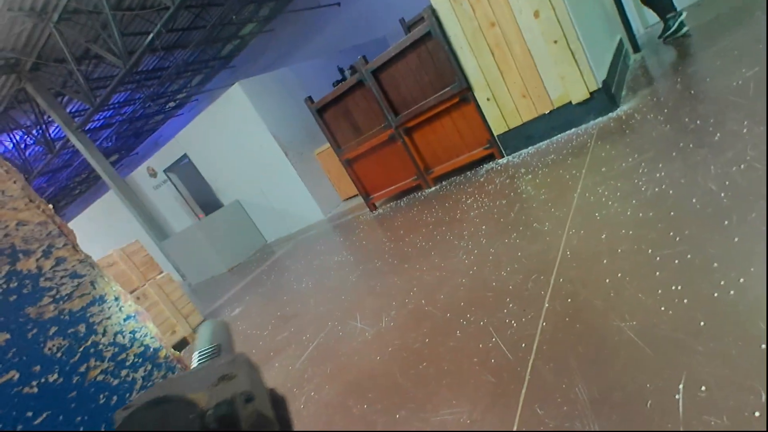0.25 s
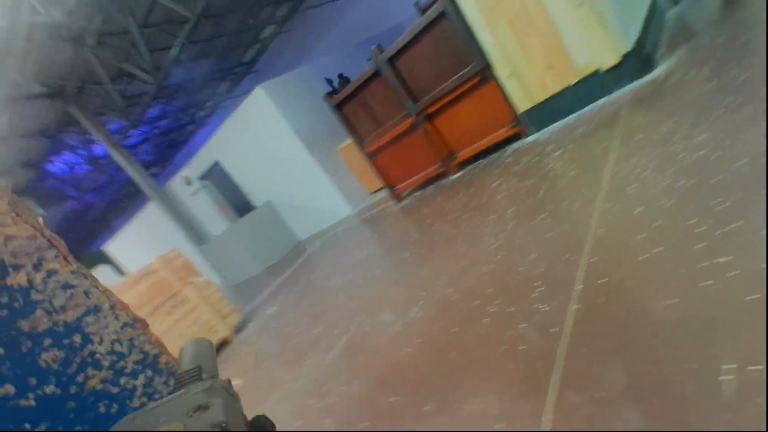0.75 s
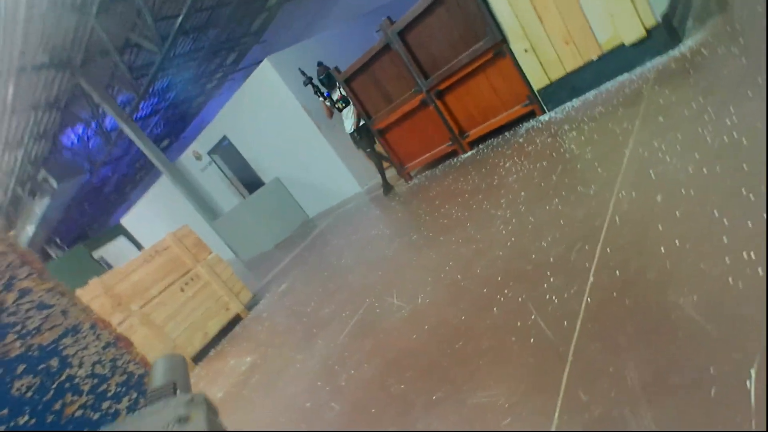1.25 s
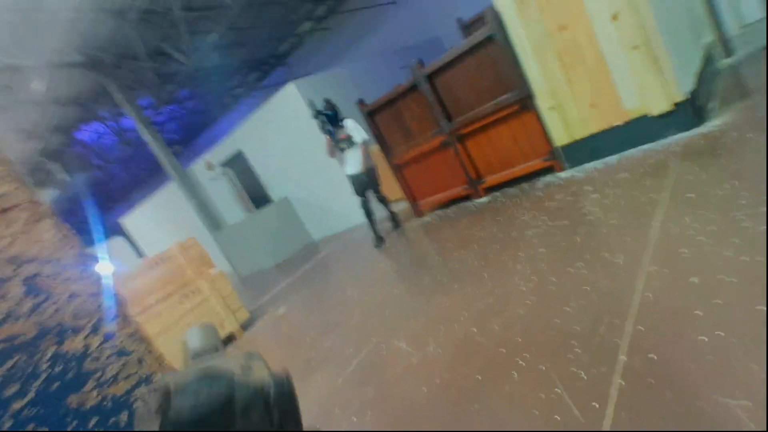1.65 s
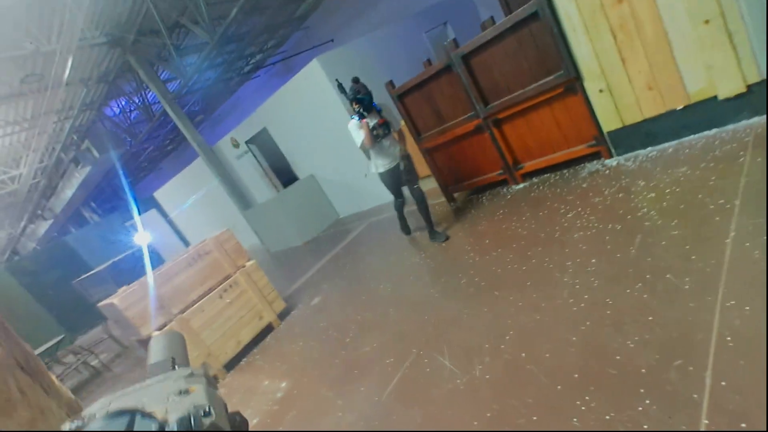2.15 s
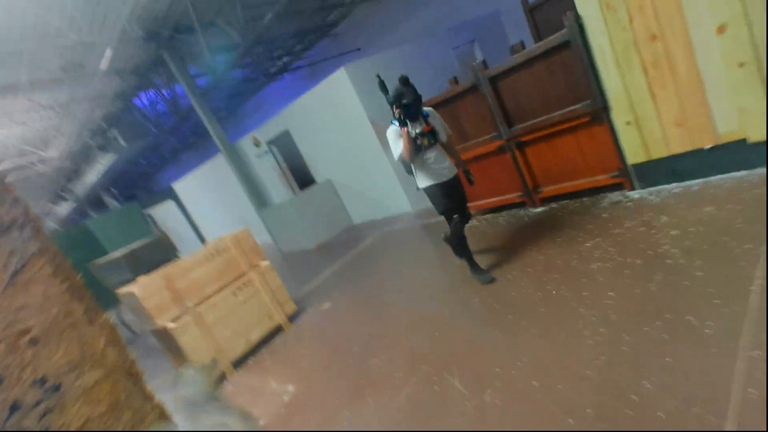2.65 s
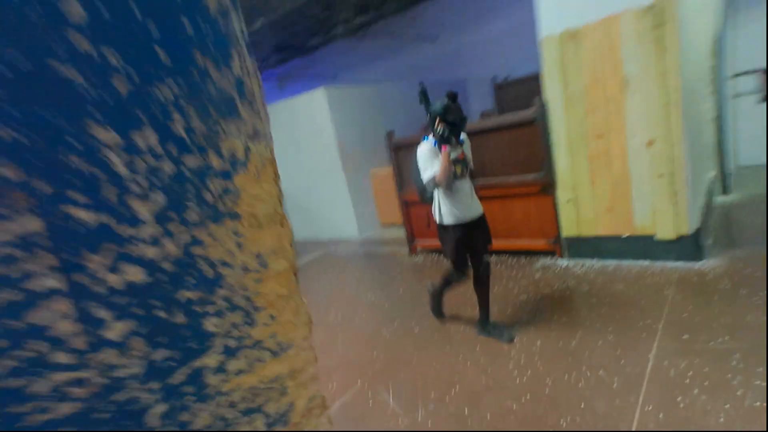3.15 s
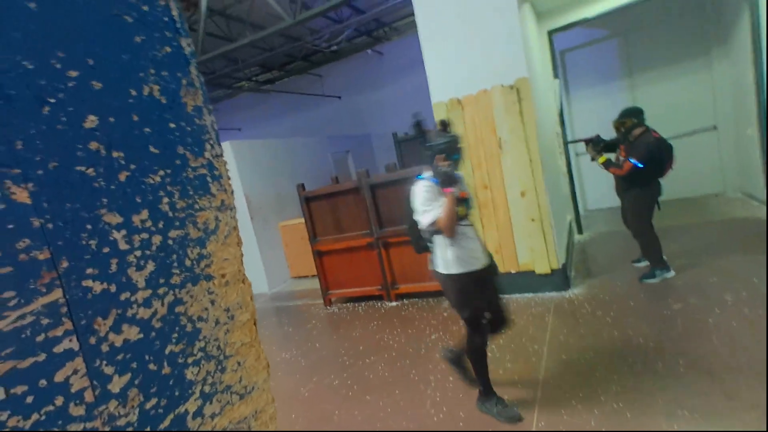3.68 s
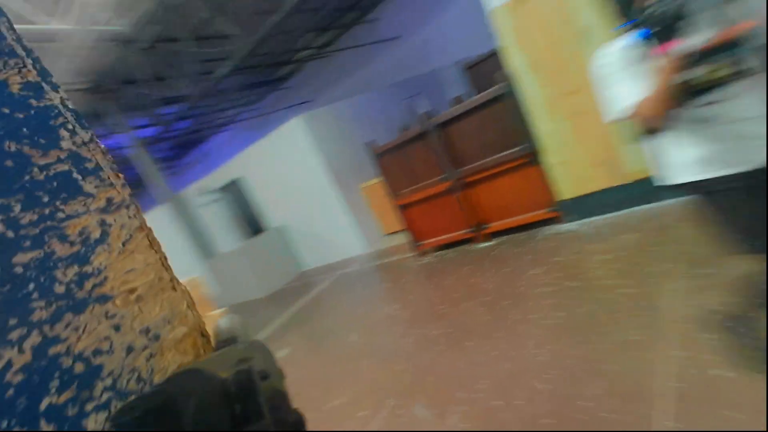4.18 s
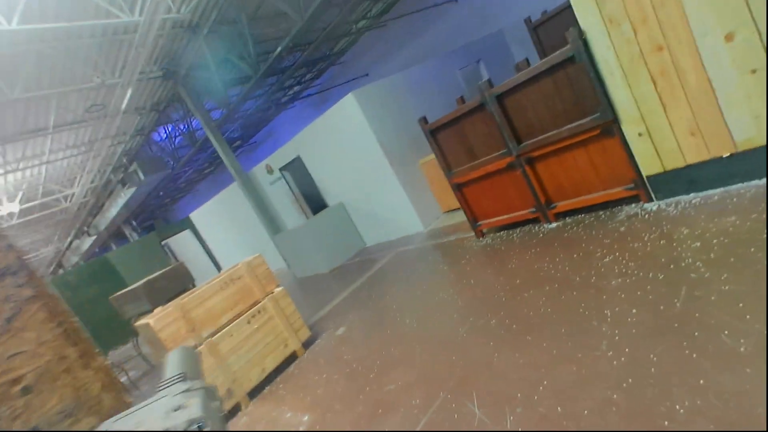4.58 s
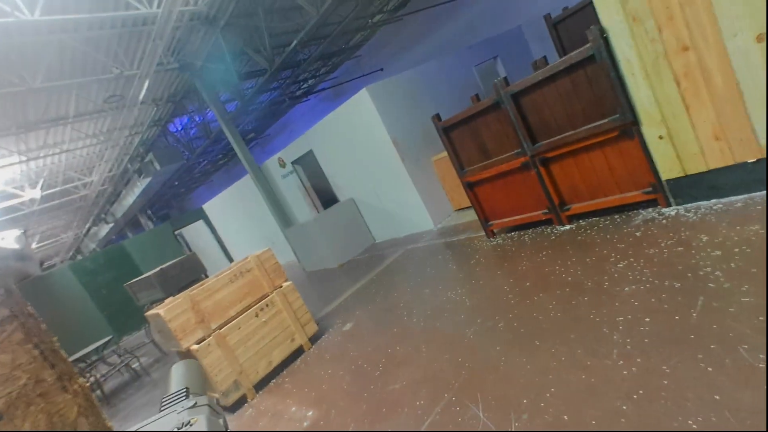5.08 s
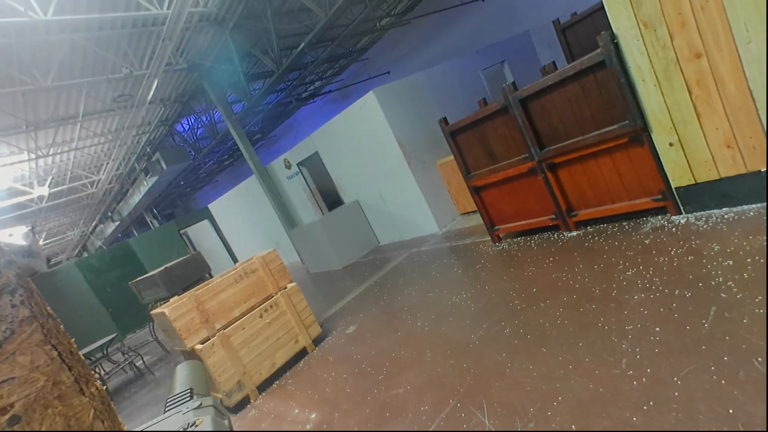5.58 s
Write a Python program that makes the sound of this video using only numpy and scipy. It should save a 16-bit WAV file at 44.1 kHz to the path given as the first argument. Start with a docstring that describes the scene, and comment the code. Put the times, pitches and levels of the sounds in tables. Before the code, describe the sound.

Close, muffled camera-housing sound in a big hall: soft booms, plastic taps and small ticks, with blurred far gunfire swelling behind. Two close airsoft shots clatter in the middle, each a rapid cluster of piston and bolt clacks jolting the mount. Later, bumps thicken, other players' shots crack and echo, a single close shot hits hard, then lighter cracks fade into airy din.

```python
"""Airsoft rifle in an echoing hall

Three shots, two close together and one later, are clusters of short noise clacks with damped metal modes.
Jolts and handling drive damped modes of the camera mount, which booms and knocks; its housing taps and ticks.
Distant shots are noise cracks and frequency-dependent hall tails, over a swelling and ebbing din and hiss.
Airborne noise takes the colour of housing and microphone port; the loudest peaks saturate."""
import sys
import numpy as np
from scipy import signal
from scipy.fft import rfft, irfft, next_fast_len
from scipy.io import wavfile
from scipy.ndimage import map_coordinates

SR = 44100
rng = np.random.default_rng(int(sys.argv[2]) if len(sys.argv) > 2 else 0)


def pcm_store(signal):
    """Save signal as 16-bit PCM."""
    levels = np.round(np.clip(np.atleast_2d(signal), -1, 1) * 32767)
    wavfile.write(sys.argv[1], SR, levels.astype(np.int16).T)


N = 257103  # samples

# Shots of the near rifle. Each row: start in seconds, first clack to piston slam in seconds,
# clack gain in dB, gain of the kick into the mount in dB.
SHOTS = [(2.3918, .0685, -1.5, 0), (2.5505, .081, -2, -4), (4.5488, .0853, -1.5, 4)]
# Clacks of one firing cycle. Each row: place (0 start, 1 slam), level in dB, dull body in dB relative,
# treble in dB relative, nominal t60 in seconds, nominal rise in seconds.
CYCLE_CLACKS = [(0, -22.5, -19, -18, 0.018, 0.0032), (.1, -12.5, -27, -16, 0.027, 0.0017),
                (.25, -12, 1.5, -19, 0.014, 0.00097), (0.446, -15, 5, -15, 0.043, 0.00085),
                (.845, -24.5, 4.5, -16.5, .033, .002), (0.996, -6.5, -24, -15, 0.032, 0.0029)]
# Loose parts rattling around the slam. Each row: start in seconds, level in dB, dull body in dB relative.
RATTLES = [(2.4563, -23, 5.5), (2.4947, -24, 8.5), (2.5004, -18, 1), (2.674, -31, 2), (4.6466, -20, 20),
           (4.657, -32, 15), (4.6677, -24, 12.5), (4.676, -23, 3.5), (4.7068, -39, 23)]
RATTLE_TREBLE_DB, RATTLE_T60_S, RATTLE_RISE_S = -21, 0.016, 0.00102
# The rifle's parts ringing. Each row: frequency in Hz, level in dB, t60 in seconds.
METAL_MODES = [(1280, 0, .025), (3000, -6, .014), (3500, -7, .012), (4420, -1, .024), (5400, -9, .013),
               (7250, -13, .015)]
# Clack spectrum. Each row: frequency in Hz, relative density in dB per Hz.
CLACK_COLOUR = [(1200, -33), (2000, -2), (3100, -5), (4500, -0.5), (6000, 1.5), (7500, -93)]
# Clack treble spectrum. Each row: frequency in Hz, relative density in dB per Hz.
TREBLE_COLOUR = [(5000, -43.5), (6000, 0), (10000, 8), (16500, 2)]
# Dull receiver rattle spectrum. Each row: frequency in Hz, relative density in dB per Hz.
BODY_COLOUR = [(290, -89.5), (500, -26.5), (625, -1), (945, -2.5), (1290, 7.5), (1630, 1.5), (1810, -7),
               (2040, -53), (2400, -10.5), (3120, -41), (5280, -120)]

# Jolts of the mount. Each row: start in seconds, tap level in dB, knock level in dB, knock pitch in Hz,
# boom level in dB.
JOLTS = [(0.259, -60, -45, 171, -29.5), (0.503, -40.5, -33.5, 114, -38), (0.662, -41, -30, 193, -27),
         (0.702, -44, -41, 120, -59), (0.774, -20, -25, 190, -26.5), (0.973, -45, -45, 133, -43),
         (1.135, -45, -37.5, 150, -30.5), (1.299, -48, -45, 145, -28), (1.334, -36, -35, 170, -28.5),
         (1.362, -26, -22, 184, -50), (1.394, -32, -34, 197, -34), (1.641, -23.5, -6.5, 114, -5),
         (1.653, -11, -20.5, 174, -14), (2.05, -30, -31.5, 117, -30.5), (2.252, -22, -23.5, 178.5, -38),
         (2.304, -25, -29.5, 173, -23), (2.369, -24.5, -35, 186, -49), (2.451, -20, -8, 107, -18),
         (2.487, -5.5, -25, 110, -2), (2.511, -16, -15, 161, -5), (2.671, -31, -33, 128, -48),
         (2.791, -27, -28.5, 178, -31), (2.839, -56, -33.5, 165, -30.5), (2.893, -29, -27.5, 184, -34.5),
         (3.056, -33, -27, 183, -34), (3.091, -53, -49, 133, -23.5), (3.327, -45, -72, 113, -30.5),
         (3.45, -50, -49, 113, -38), (3.84, -35.5, -27, 114, -12.5), (3.862, -15, -15.5, 150, -18.5),
         (3.889, -40, -25, 119, -15), (3.924, -30, -36.5, 191, -48), (4.077, -26, -14.5, 108, -10),
         (4.143, -19, -23.5, 124, -22), (4.245, -36, -17, 118, -41), (4.261, -19, -20.5, 162, -10),
         (4.282, -24, -17, 111.5, -27), (4.307, -20, -16.5, 123, -6.5), (4.474, -23, -28, 183, -37),
         (4.496, -29, -33, 141, -45), (4.66, -3.5, -20.5, 131, -6), (4.688, -14.5, -10.5, 166, -5.5),
         (4.714, -19, -14.5, 160, -8), (4.945, -34, -56, 186, -26.5), (5.096, -35, -38, 114, -30.5)]
# Jolts from one firing cycle. Each row: place (0 start, 1 slam), tap level in dB, knock level in dB,
# knock pitch in Hz, boom level in dB, direction (1 forward, -1 back).
CYCLE_KICKS = [(0, -23, -17.5, 130, -12, 1), (0.231, -8.5, -11.5, 119.4, -10, -1),
               (0.442, -16, -11.5, 154, -15, -1), (1.035, -26, -8.5, 105, -3, 1)]
# Modes of a knock. Each row: multiple of its pitch, level in dB, t60 in seconds.
FLEX_MODES = [(1, 8.5, 0.071), (1.45, -8, 0.037), (2.1, -21, 0.027)]
# A part that rings on after knocks. Each row: frequency in Hz, level in dB, t60 in seconds.
STRAP_MODES = [(322, -28, .35)]
# Housing modes. Each row: frequency in Hz, level in dB, t60 in seconds.
TAP_MODES = [(637, -8, 0.1), (776, -8, 0.037), (1157, -2.5, 0.024), (1533, -2, 0.021)]
# The mount swinging. Each row: frequency in Hz, level in dB, t60 in seconds.
BOOM_MODES = [(52.52, 3, 0.23), (43, -12, 0.11), (76.6, -5, 0.14)]
BOOM_LAG_S = 0.0033  # swing-back after the knock
SNAP_DB = -22.5  # bright edge, on top of the tap level
# Contact noise spectrum of a tap. Each row: frequency in Hz, relative density in dB per Hz.
TAP_COLOUR = [(150, -21), (300, 3.5), (520, -10.5), (750, -2), (1000, -21), (1400, -3), (2000, -22.5),
              (3000, -100)]
# Spectrum of a tap's bright edge. Each row: frequency in Hz, relative density in dB per Hz.
SNAP_COLOUR = [(1200, -25), (1700, -1.5), (2400, -7), (3200, 1.5), (4300, -19.5), (6500, -37)]
# Spectrum of a knock's rough body. Each row: frequency in Hz, relative density in dB per Hz.
THUD_COLOUR = [(60, -31), (110, 10.5), (200, -3), (330, -16), (520, -40.5), (900, -110)]

# Hard gear ticking on the housing. Each row: start in seconds, level in dB.
TICKS = [(0.704, -41), (.776, -34), (.972, -47), (1.3335, -31.5), (1.362, -39), (1.654, -21.5),
         (3.862, -28.5), (4.142, -32)]
# Modes of a tick. Each row: frequency in Hz, level in dB, t60 in seconds.
TICK_MODES = [(1475, -2, 0.023), (1690, 0.5, 0.028), (3090, -14.5, 0.019)]

# Hands shaking the mount. Each row: time in seconds, boom level in dB.
SHAKE = [(0.0, -53), (0.7, -42.5), (1.09, -50.5), (1.57, -39), (1.8, -47), (2.03, -48), (2.34, -45),
         (2.52, -19), (2.57, -28), (2.69, -52), (2.79, -39), (3.41, -57), (3.64, -48.5), (4.22, -40.5),
         (4.56, -28), (5.03, -38.5), (5.2, -45.5), (5.83, -56.5)]
# Hands rubbing the mount. Each row: time in seconds, knock level in dB.
RUB = [(0, -55), (.08, -56.5), (.2, -69.5), (.32, -45), (.45, -68.5), (.57, -50), (1.05, -71), (1.22, -45),
       (1.33, -43.5), (1.5, -62), (2.03, -65), (2.18, -51.5), (2.52, -35), (2.89, -64), (3.36, -61),
       (3.77, -64.5), (4.05, -60), (4.2, -37.5), (4.55, -41.5), (4.68, -28), (4.98, -45), (5.13, -55),
       (5.83, -70)]
# The mount flexing under the hands. Each row: frequency in Hz, level in dB, t60 in seconds.
KNOCK_MODES = [(108, -14, 0.03), (147, -2, 0.067), (182, 2, 0.11), (270, -20, 0.019)]
# The whole camera swaying. Each row: frequency in Hz, level in dB, t60 in seconds.
SWAY_MODES = [(29, 0, 0.072)]
SWAY_DB = 1.5  # relative to the boom

# Distant shots in view. Each row: start in seconds, crack level in dB.
OPEN_SHOTS = [(3.8899, -29), (4.104, -27.5), (4.3416, -28.5), (5.0407, -27), (5.318, -26.5), (5.5953, -27)]
# Early echoes of a shot in view. Each row: lag in seconds, level in dB relative,
# treble tilt in dB per octave, t60 in seconds.
WALLS = [(.017, -10.5, -6, 0.071), (.052, -8, 3, 0.014), (.068, -18, 7, .05)]
# Distant shots behind walls. Each row: start in seconds, level in dB, rise in seconds,
# treble tilt in dB per octave.
HIDDEN_SHOTS = [(0.0695, -40, 0.073, 4), (0.8194, -54.5, 0.012, 5.5), (1.106, -30, 0.12, -8),
                (1.3014, -32.5, 0.033, 1), (1.4894, -40.5, 0.024, -4.5), (1.7304, -31, 0.0065, -1.5),
                (1.8817, -31, 0.0076, -1.5), (2.0386, -30, 0.0059, -2.5), (2.1037, -33.5, 0.0073, 2),
                (2.203, -31.5, 0.0063, -0.5), (2.2542, -36, 0.0089, 3), (2.3392, -17.5, 0.11, -4),
                (2.719, -27.5, 0.038, 2.5), (2.8768, -31, 0.011, 2.5), (2.9974, -26.5, 0.14, -2.5),
                (3.3238, -42, 0.017, 2), (3.5173, -59, 0.028, 27), (4.788, -27, 0.017, 0.5),
                (4.8286, -35.5, 0.0021, 4.5)]
HALL_ANSWER_DB = -13  # on top of the crack level
# Spectrum of far shots and hall tails. Each row: frequency in Hz, relative density in dB per Hz.
FAR_COLOUR = [(200, -7), (350, 1), (1500, 0.5), (5000, 1), (16500, -1)]
# Hall decay. Each row: frequency in Hz, t60 in seconds.
HALL_T60 = [(300, 0.93), (1500, 0.77), (5000, 0.77), (8000, 0.68), (14000, 0.75)]

# Din of the hall, swelling and ebbing. Each row: time in seconds, level in dB.
WASH = [(0.0, -58.5), (1.17, -61.5), (1.3, -51), (2.55, -39.5), (3.02, -51.5), (3.54, -50), (4.53, -43),
        (5.36, -53.5), (5.83, -53.5)]
# Din spectrum. Each row: frequency in Hz, relative density in dB per Hz.
WASH_COLOUR = [(200, -54), (400, -3), (1300, 1), (3100, -1), (4500, -2.5), (7000, -6.5), (12000, -14.5)]
# Microphone noise spectrum. Each row: frequency in Hz, relative density in dB per Hz.
HISS_COLOUR = [(180, -34), (300, 4.5), (894, -1.5), (1690, -1.5), (2410, -14), (4630, -12), (15000, -17.5),
               (16600, -30)]
# Housing response to airborne noise. Each row: frequency in Hz, gain in dB.
HOUSING = [(350, -9.5), (540, -12.5), (900, -10.5), (1300, -1), (1720, -0.5), (2400, -11), (3080, -4.5),
           (3800, -10.5), (4500, -5.5), (5900, -16.5), (7000, -18.5), (8400, -28.5), (10000, -26.5),
           (13000, -34), (16500, -51)]
# Narrow microphone port resonances. Each row: frequency in Hz, width in Hz, gain in dB.
PORT = [(1745, 45, 6.5), (4480, 310, 3), (7220, 500, 3), (10450, 900, 0.5)]
TOP_HZ = 16480  # band limit


def amp(db):
    """dB to gain."""
    return 10 ** (np.asarray(db) / 20)


def unit(x):
    """x at rms 1."""
    return x / np.sqrt(np.mean(x ** 2) + 1e-20)


def along(points, hz):
    """Interpolates (Hz, value) points on a log frequency axis."""
    f, v = np.transpose(points)
    return np.interp(np.log(hz + 1), np.log(f + 1), v)


def curve(rows):
    """Interpolates (s, value) rows to one value per sample."""
    s, values = np.transpose(rows)
    return np.interp(np.arange(N) / SR, s, values)


def wobble(rate_hz):
    """Smooth random curve with rate_hz knots a second."""
    knots = rng.standard_normal(int(N * rate_hz / SR) + 4)
    return map_coordinates(knots, [np.arange(N) * rate_hz / SR])


def filtered(x, response):
    """x through a response given as a function of Hz."""
    m = next_fast_len(len(x) + 8192)
    return irfft(rfft(x, m) * response(np.fft.rfftfreq(m, 1 / SR)), m)[:len(x)]


def noise(colour, size=N, air=True, tilt_db=0):
    """Coloured noise of rms 1; airborne noise also takes the colour of housing and port."""
    def response(hz):
        gain_db = along(colour, hz) + tilt_db * np.log2(np.maximum(hz, 1700) / 1700)
        if air:
            port_db = sum(db / (1 + (2 * (hz - c) / w) ** 2) for c, w, db in PORT)
            gain_db = gain_db + along(HOUSING, hz) + port_db
        return amp(gain_db)
    return unit(filtered(rng.standard_normal(size), response))


def ring(modes, attack_s, scatter_db=0, detune=0):
    """Damped modes after one blow, each with random strength and pitch offsets."""
    t = np.arange(SR // 2) / SR
    tone = np.zeros(len(t))
    for hz, db, t60 in modes:
        a, b = rng.standard_normal(2)
        decay = amp(db + scatter_db * a - 60 * t / t60)
        tone += decay * np.sin(2 * np.pi * hz * (1 + detune * b) * t)
    return tone * (1 - np.exp(-t / attack_s)) ** 2


def puff(rise_s, t60_s, size):
    """Envelope with a rounded rise and exponential decay, peak 1."""
    t = np.arange(size) / SR
    rise = (1 - np.exp(-t / max(rise_s, 0.0002))) ** 2
    shape = rise * amp(-60 * t / max(t60_s, 0.004))
    return shape / shape.max()


def add(track, s, x):
    """Mixes x into the track from time s."""
    part = track[round(s * SR):][:len(x)]
    part += x[:len(part)]


def in_cycle(place, shot):
    """Time of a place within a shot's firing cycle."""
    return shot[0] + place * shot[1]


def hall_tail(size, tilt_db=0):
    """Noise whose frequencies decay at their own rates; the tilt shapes its treble."""
    dense = noise(FAR_COLOUR, size=size, tilt_db=tilt_db)
    hz, t, z = signal.stft(dense, SR, nperseg=256)
    decay = amp(-60 * t / along(HALL_T60, hz)[:, None])
    return signal.istft(z * decay, SR, nperseg=256)[1][:size]


def rifle():
    """Piston, bolt and spring hit in gritty clacks; the receiver adds a duller rattle; the hall answers."""
    mid, dull, treble, tail, rings = np.zeros((5, N))
    hits = [(in_cycle(place, shot), db + shot[2], *rest)
            for shot in SHOTS for place, db, *rest in CYCLE_CLACKS]
    hits += [(*row, RATTLE_TREBLE_DB, RATTLE_T60_S, RATTLE_RISE_S) for row in RATTLES]
    for s, db, body_db, treble_db, t60, rise in hits:
        add(mid, s, amp(db - 10) * puff(rise, t60, 4000))
        add(rings, s, amp(db - 2.5) * ring(METAL_MODES, 1.5 * rise, scatter_db=5, detune=0.01))
        add(dull, s, amp(db + body_db - 7.5) * puff(0.0013, 1.19 * t60, 4000))
        add(treble, s, amp(db + treble_db - 6) * puff(1.35 * rise, t60, 4000))
        add(tail, s, amp(db - 19.5) * puff(0.0032, 0.06, SR))
        add(tail, s, amp(db - 40.5) * puff(0.0032, 0.7, SR))
    grit = amp(1.58 * wobble(500))  # loose parts chatter within each clack
    clacks = grit * (mid * noise(CLACK_COLOUR) + treble * noise(TREBLE_COLOUR))
    body = amp(3 * wobble(250)) * dull * noise(BODY_COLOUR, air=False)
    return clacks + rings + body + tail * noise(FAR_COLOUR)


def jolts():
    """Each jolt scuffs and rings the housing, flexes the mount and sets it swinging."""
    out, scuff, snap, thud = np.zeros((4, N))
    blows = [(*row, 1) for row in JOLTS]
    for shot in SHOTS:
        kick = shot[3]
        blows += [(in_cycle(place, shot), db + kick, knock_db + kick, hz, boom_db + kick, way)
                  for place, db, knock_db, hz, boom_db, way in CYCLE_KICKS]
    for s, db, knock_db, knock_hz, boom_db, way in blows:
        flex = [(knock_hz * k, level, t60) for k, level, t60 in FLEX_MODES] + STRAP_MODES
        add(scuff, s, amp(db - 10.5) * puff(0.0011, 0.033, 4000))
        add(snap, s, amp(db + SNAP_DB) * puff(0.00087, 0.026, 4000))
        add(out, s, amp(db - 15) * ring(TAP_MODES, 0.0008, scatter_db=3, detune=0.02))
        add(thud, s, amp(knock_db - 5.5) * puff(0.0041, 0.066, 8000))
        add(out, s, amp(knock_db - 5) * ring(flex, 0.0018, scatter_db=3, detune=0.02))
        boom = ring(BOOM_MODES, 0.0029, scatter_db=0.5, detune=0.036)
        add(out, s + BOOM_LAG_S, -way * amp(boom_db) * boom)
    rough = thud * noise(THUD_COLOUR, air=False) + scuff * noise(TAP_COLOUR, air=False)
    return out + rough + snap * noise(SNAP_COLOUR)


def ticks():
    """Small hard contacts ring a few bright modes of the housing."""
    out = np.zeros(N)
    for s, db in TICKS:
        add(out, s, amp(db) * ring(TICK_MODES, 0.001, scatter_db=2.5, detune=0.03))
    return out


def stirred(modes, rate_hz):
    """Modes driven by noise pushes of wandering strength, at rms 1."""
    pushes = rng.standard_normal(N) * amp(2.93 * wobble(rate_hz))
    return unit(signal.fftconvolve(pushes, ring(modes, 0.0015))[:N])


def handling():
    """Small random pushes keep the mount's resonances stirring."""
    swing = stirred(BOOM_MODES, 9.1) + amp(SWAY_DB) * stirred(SWAY_MODES, 8)
    return amp(curve(SHAKE)) * swing + amp(curve(RUB)) * stirred(KNOCK_MODES, 25)


def far_shots():
    """Shots in view crack and echo off near walls; hidden ones arrive only as the hall's swelling answer."""
    out, t = np.zeros(N), np.arange(SR) / SR
    for s, db in OPEN_SHOTS:
        add(out, s, amp(db - 6.5) * puff(0.0012, 0.035, 4000) * noise(FAR_COLOUR, size=4000))
        for lag, echo_db, tilt_db, t60 in WALLS:
            echo = puff(0.0012, t60, 4000) * noise(FAR_COLOUR, size=4000, tilt_db=tilt_db)
            add(out, s + lag, amp(db - 2 + echo_db) * echo)
        add(out, s, amp(db + HALL_ANSWER_DB) * (1 - np.exp(-t / 0.012)) * hall_tail(SR))
    for s, db, rise, tilt_db in HIDDEN_SHOTS:
        early = 1 + 1.9 * amp(-60 * t / 0.11)  # extra energy that dies first
        swell = (1 - np.exp(-t / max(rise, 0.001))) * early
        add(out, s, amp(db - 13) * swell * hall_tail(SR, tilt_db))
    return out * amp(1.8 * wobble(60))  # scattered echoes flutter


def background():
    """The hall's lingering din and the microphone's own hiss, both shaped noise."""
    din = amp(curve(WASH) - 5.5 + 0.5 * wobble(12)) * noise(WASH_COLOUR)
    return din + amp(-67) * noise(HISS_COLOUR, air=False)


def scene():
    """Sum of all sources at the single microphone."""
    return (rifle() + jolts() + ticks() + handling() + far_shots() + background())[None]


def record(dry):
    """Two-pole bass roll-off at 22 Hz, hard-kneed saturation, then a band limit at TOP_HZ."""
    heard = filtered(dry[0], lambda hz: (1j * hz / (22 + 1j * hz)) ** 2)
    saturated = 1.02 * heard / (1 + np.abs(heard) ** 12) ** (1 / 12)
    return np.clip(filtered(saturated, lambda hz: hz < TOP_HZ), -1, 1)[None]


dry = scene()
out = record(dry)
pcm_store(out)
```